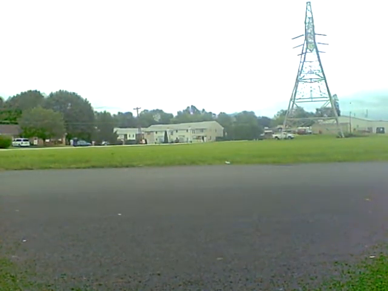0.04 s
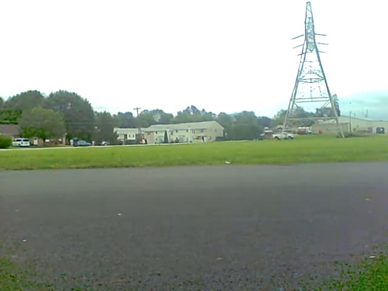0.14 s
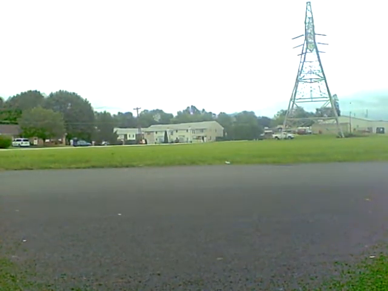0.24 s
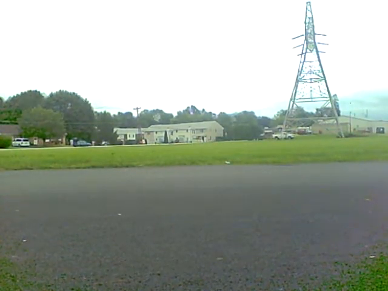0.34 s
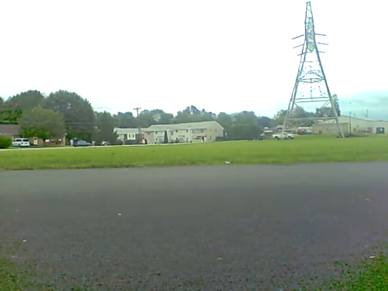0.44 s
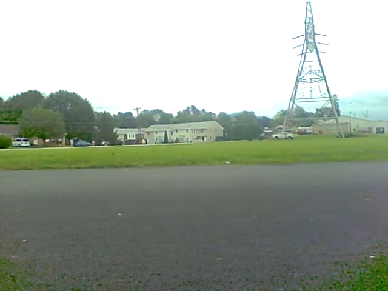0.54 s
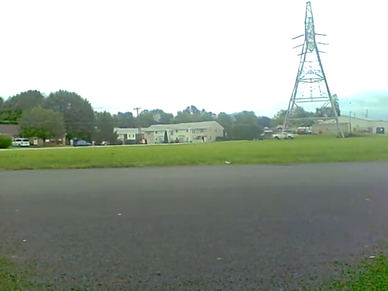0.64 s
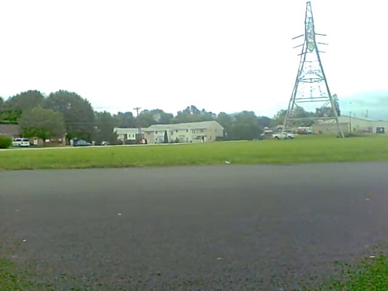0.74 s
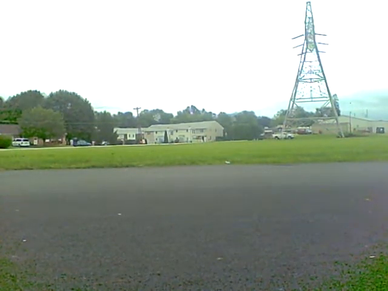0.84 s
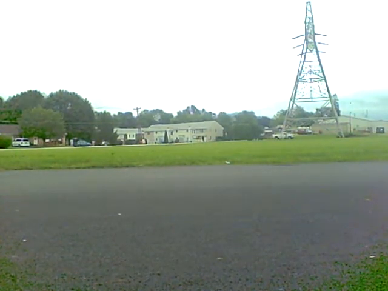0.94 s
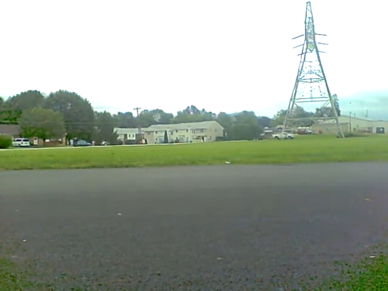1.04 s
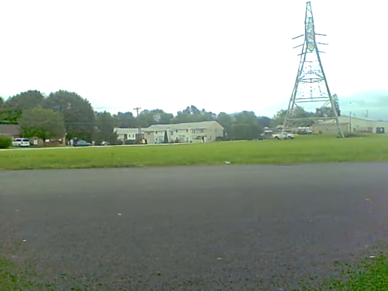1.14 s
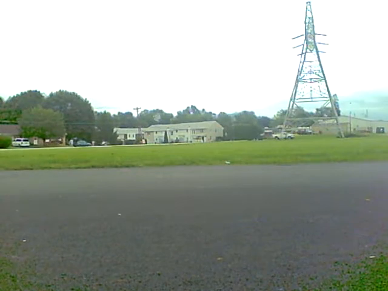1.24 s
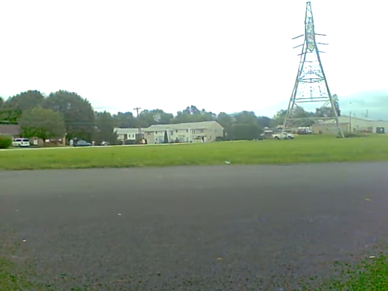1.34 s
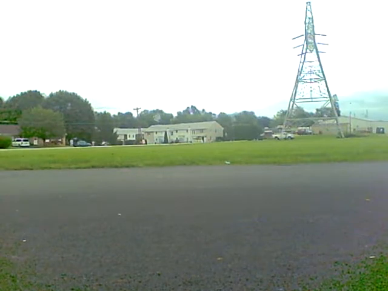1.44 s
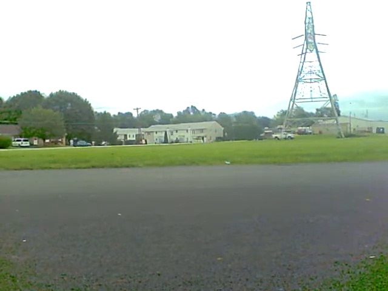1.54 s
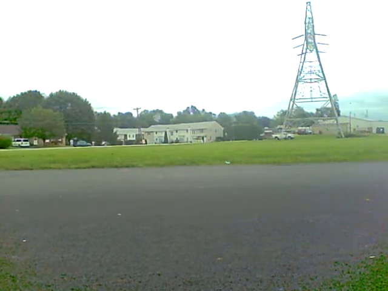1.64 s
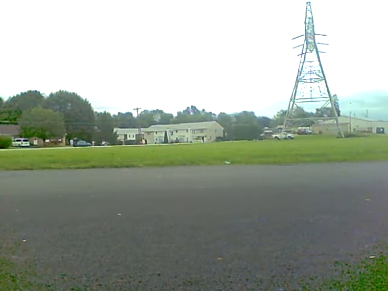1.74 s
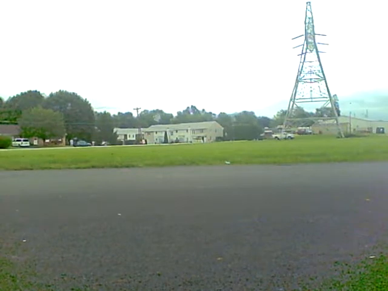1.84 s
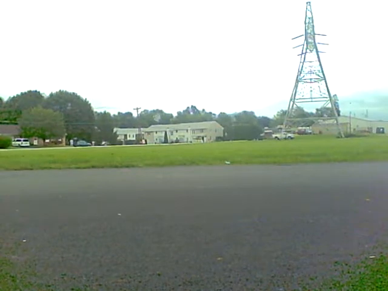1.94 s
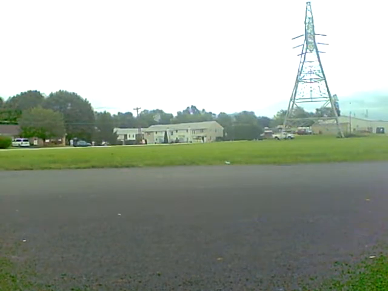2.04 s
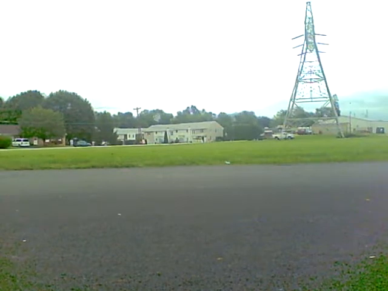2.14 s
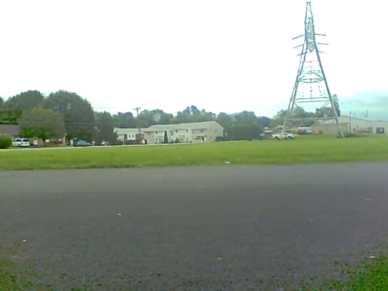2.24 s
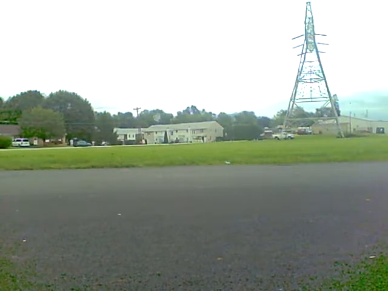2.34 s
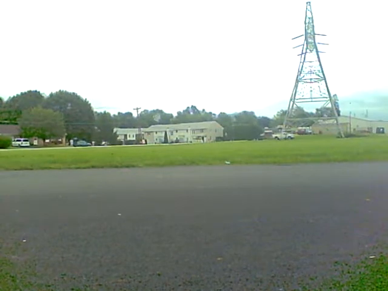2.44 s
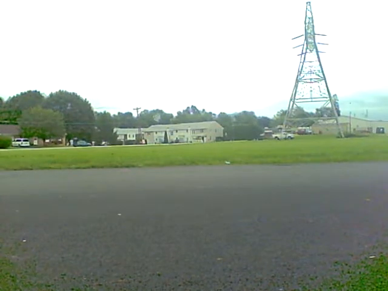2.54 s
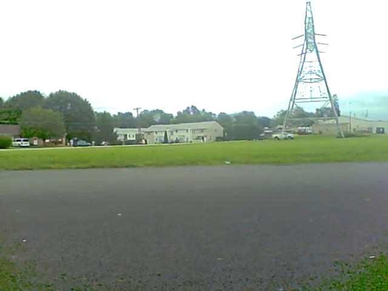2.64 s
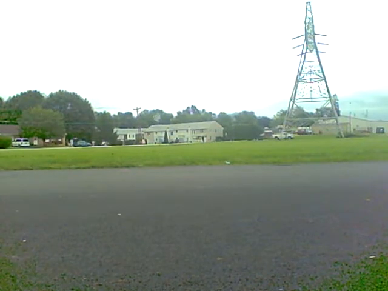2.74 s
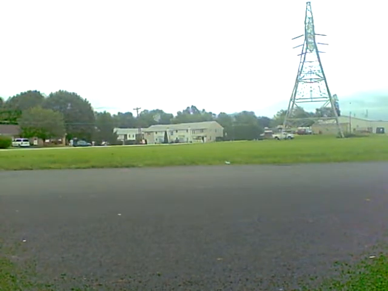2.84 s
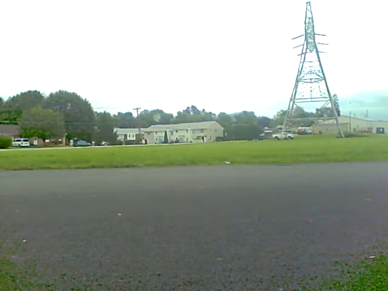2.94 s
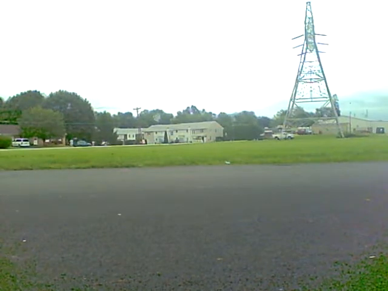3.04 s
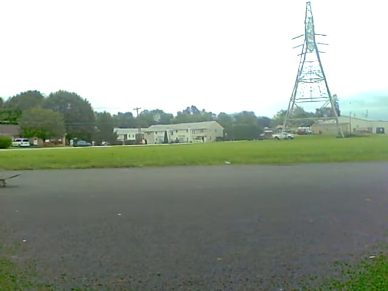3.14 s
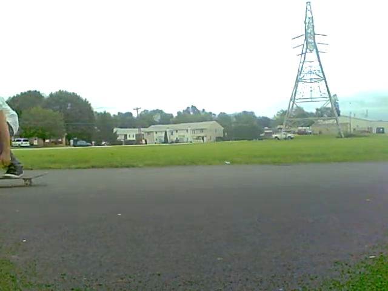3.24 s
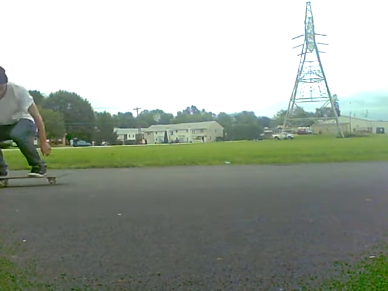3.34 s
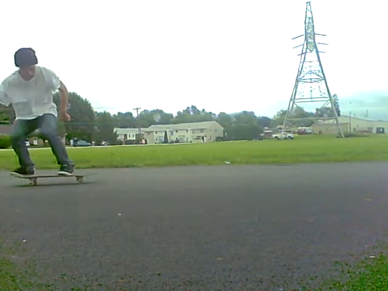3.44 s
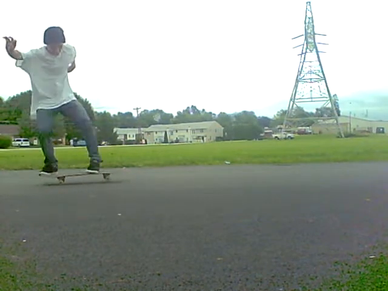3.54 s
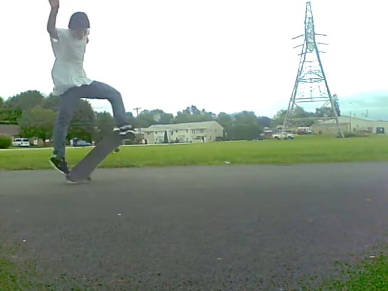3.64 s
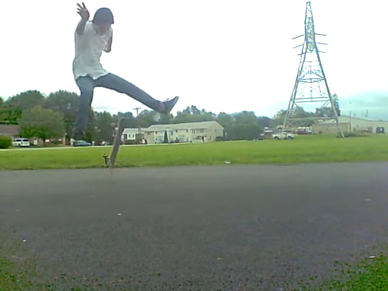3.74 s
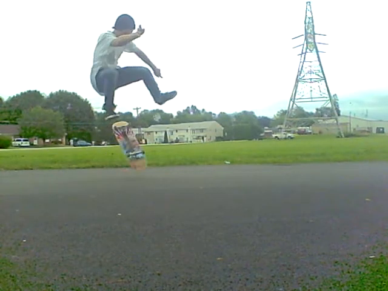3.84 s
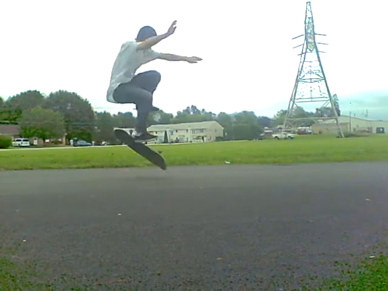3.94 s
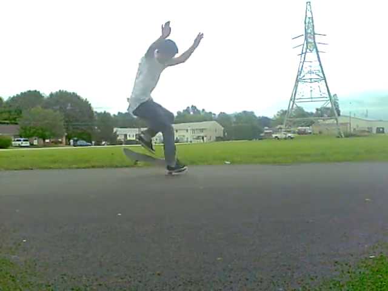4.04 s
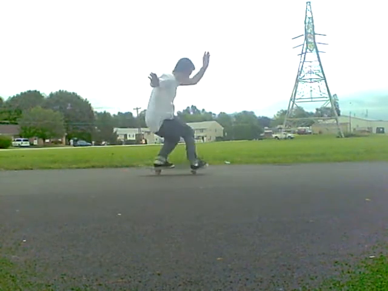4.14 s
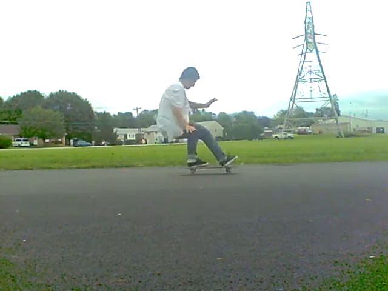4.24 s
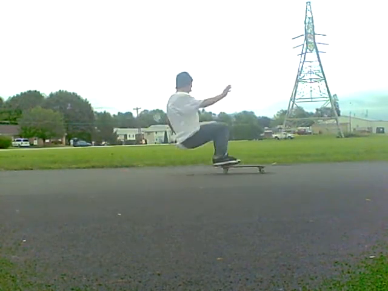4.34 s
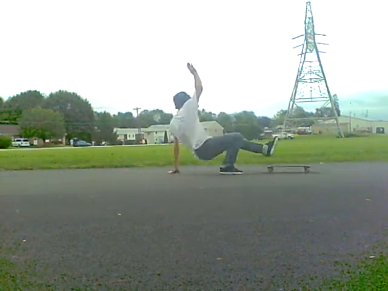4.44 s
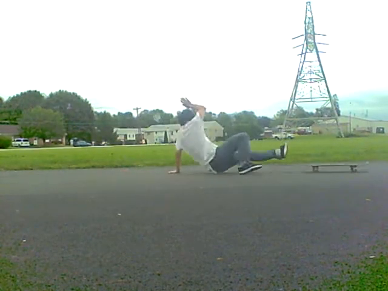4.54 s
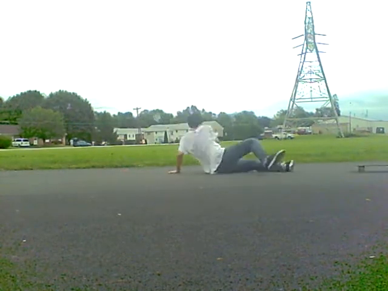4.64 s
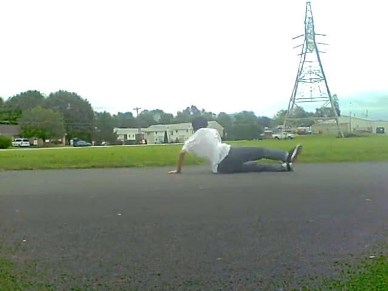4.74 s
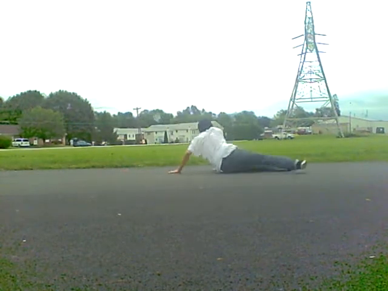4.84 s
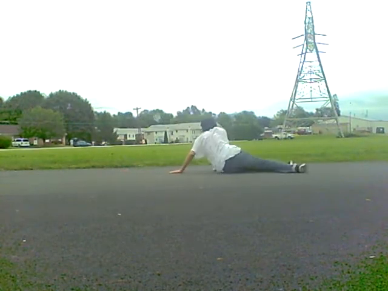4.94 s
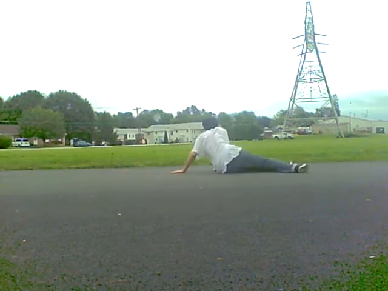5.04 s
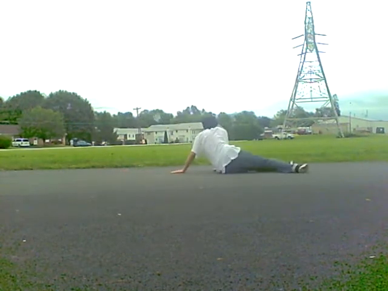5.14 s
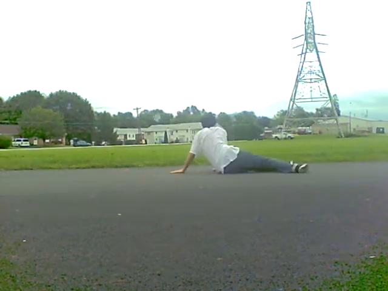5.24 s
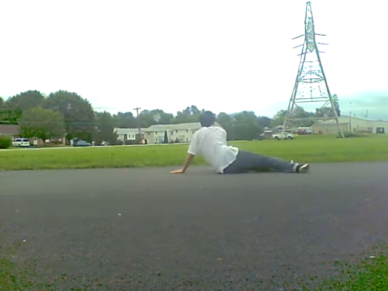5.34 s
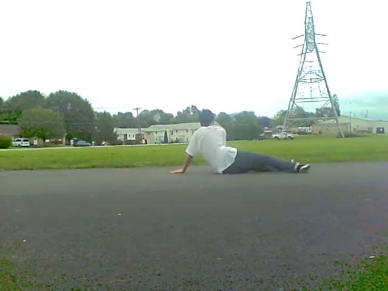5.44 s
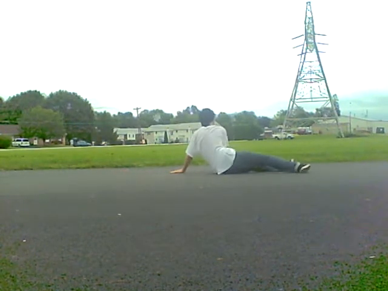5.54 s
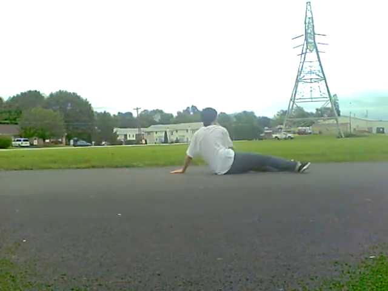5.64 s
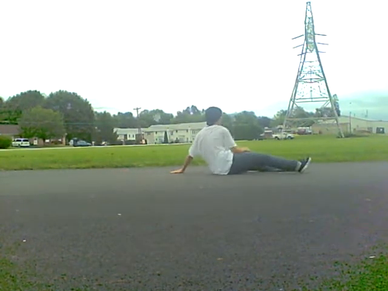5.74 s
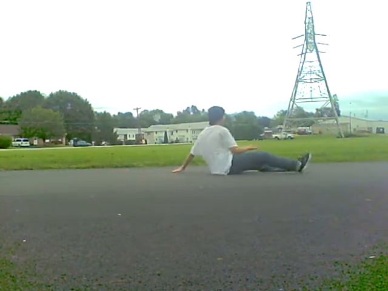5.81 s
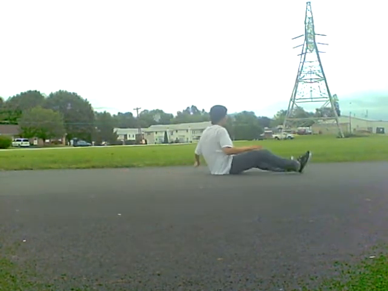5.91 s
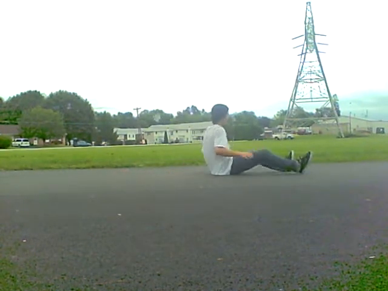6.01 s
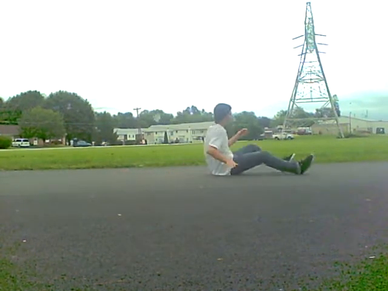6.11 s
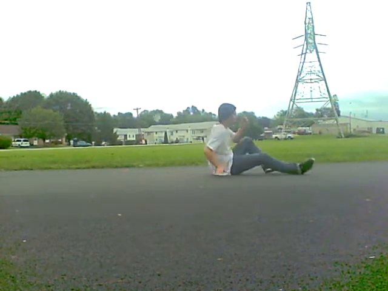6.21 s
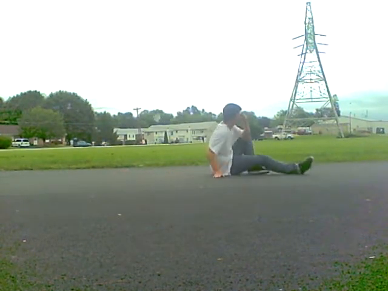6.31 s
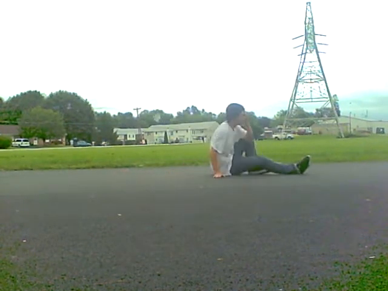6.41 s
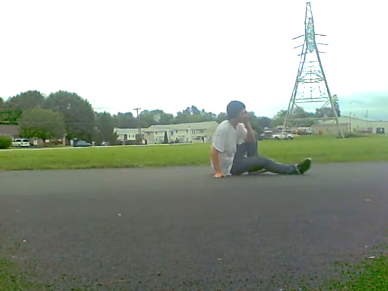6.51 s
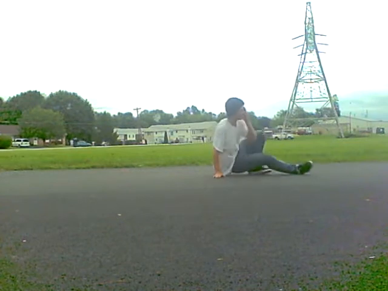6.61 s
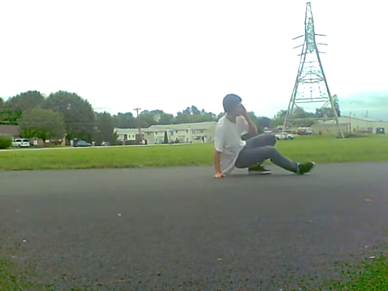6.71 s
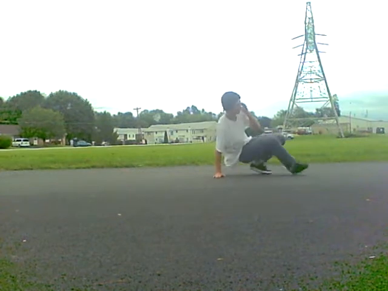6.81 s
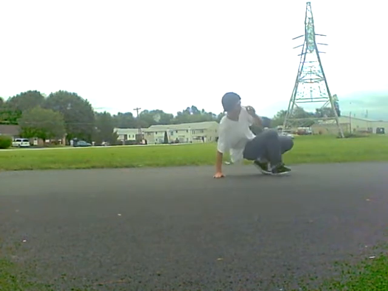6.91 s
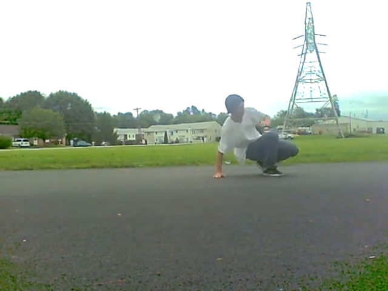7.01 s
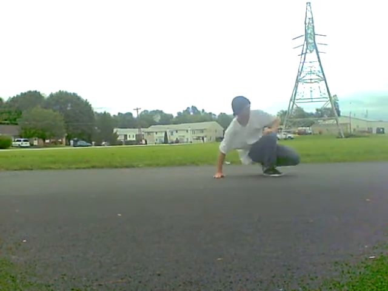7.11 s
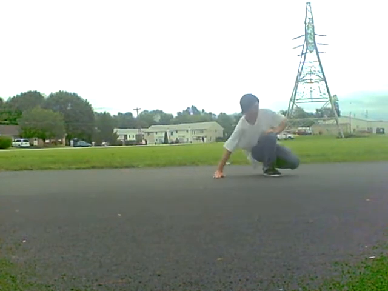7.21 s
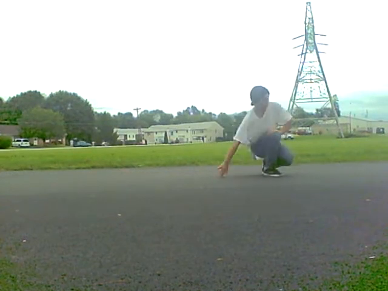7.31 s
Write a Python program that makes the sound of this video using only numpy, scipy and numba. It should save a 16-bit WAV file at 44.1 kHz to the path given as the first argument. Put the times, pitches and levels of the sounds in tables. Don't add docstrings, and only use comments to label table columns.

```python
import sys
import numpy as np
from scipy import signal
from scipy.fft import rfft, irfft
from scipy.io import wavfile
from scipy.ndimage import uniform_filter1d
from numba import njit

SR = 44100
rng = np.random.default_rng(int(sys.argv[2]) if len(sys.argv) > 2 else 0)


def wav_out(sig):
    wavfile.write(sys.argv[1], SR, np.round(np.clip(np.atleast_2d(sig).T, -1, 1) * 32767).astype(np.int16))


def invert_db(level):
    return 10 ** (np.asarray(level, dtype=float) / 20)


N = 325093
TIME = np.arange(N) / SR

# centre_hz, width_hz, level_db
CRACK_MODES = [(2260, 570, 1), (3500, 690, 2), (4760, 1400, 0), (6380, 810, 3.5)]


def unit(x):
    return x / np.sqrt(np.mean(x ** 2))


@njit
def svf(x, hz, width):
    y, band_state, low_state = np.empty(len(x)), 0., 0.
    for i in range(len(x)):
        g, k = np.tan(np.pi * hz[i] / SR), width / hz[i]
        v = (band_state + g * (x[i] - low_state)) / (1 + g * (g + k))
        band_state = 2 * v - band_state
        low_state += 2 * g * v
        y[i] = k * v
    return y


def band(x, hz, width):
    return svf(x, hz * np.ones(N), float(width))


def body(x, modes):
    out = np.zeros(N)
    for k, (hz, width, db) in enumerate(modes):
        out += (-1) ** k * invert_db(db) * unit(band(x, hz, width))
    return out


def walk(rate):
    k = int(SR / rate)
    held = rng.standard_normal(N)[np.arange(N) // k]
    return 1.77 * uniform_filter1d(uniform_filter1d(held, k), k)


def grains(rate, spread_db):
    when, size, sign = rng.random(N), rng.exponential(size=N), rng.choice([-1., 1.], N)
    return (when < rate / SR) * invert_db(spread_db * np.minimum(size, 3)) * sign


def add(out, s, sound):
    i = int(s * SR)
    out[i:i + len(sound)] += sound[:N - i]


def fade(t, t60):
    return np.exp(-np.log(1000) * t / t60)


def ring(hz, t60, rise):
    t = TIME[:SR // 5]
    return (1 - np.exp(-t / rise)) ** 2 * fade(t, t60) * np.sin(2 * np.pi * hz * t)


def bursts(events):
    out, t = np.zeros(N), TIME[:SR // 5]
    for s, db, t60 in events:
        add(out, s, invert_db(db) * (1 - np.exp(-t / 0.0003)) * fade(t, t60))
    return out


def holds(events, rise_s, fall_s):
    out = np.zeros(N)
    for s, length, db in events:
        before = np.clip((s - TIME) / rise_s, 0, 5)
        after = np.clip((TIME - s - length) / fall_s, 0, 5)
        out += invert_db(db - 20 * before - 20 * after)
    return out


def town():
    # pitch_hz, level_db per Hz
    bass = [(15, -75), (60, -76), (110, -82), (250, -85)]
    # pitch_hz, level_db per Hz
    upper_town = [(400, -79), (620, -84.5), (1000, -91), (1300, -85), (1650, -102), (2200, -103),
                  (2700, -109), (3300, -107), (4600, -112), (6400, -102), (6900, -113), (7600, -122)]
    # time_s, level_db
    swell = [
        (0, 0),
        (.6, -2.5),
        (2.5, -1.5),
        (3.7, 0),
        (4.2, -6.5),
        (4.8, -2),
        (6.9, -0.5),
        (7.37, -1.5),
    ]
    # pitch_hz, level_db (rms)
    whine_lines = [(3252, -85.5)]
    hz = np.maximum(np.fft.rfftfreq(N, 1 / SR), 1)
    table_hz, table_db = np.transpose(bass + upper_town)
    shape = invert_db(np.interp(np.log(hz), np.log(table_hz), table_db))
    noise = rfft(rng.standard_normal(N)) * shape * np.sqrt(SR / 2)
    split_hz = bass[-1][0]
    deep = irfft(noise * (hz < split_hz), N) * invert_db(8.5 + .8 * walk(2.4))
    ranges = [((hz >= split_hz) & (hz < 350), 1.2), ((hz >= 350) & (hz < 1800), 1.3), (hz >= 1800, .5)]
    air = sum(irfft(noise * part, N) * invert_db(flicker_db * walk(12)) for part, flicker_db in ranges)
    whine = sum(np.sqrt(2) * invert_db(db) * np.sin(2 * np.pi * line_hz * TIME) for line_hz, db in whine_lines)
    return deep + air * invert_db(np.interp(TIME, *np.transpose(swell))) + whine


def engine():
    # time_s, cycle_rate_hz
    speed = [(0, 28.8), (1.1, 28.9), (2.1, 28.69), (2.6, 28.7), (3.1, 28.49), (4.3, 28.68), (4.6, 28.72),
             (5.1, 28.43), (5.6, 28.28), (7.37, 28.2)]
    order = [2, 3, 5, 6, 7, 8, 3.55, 7.1, 10.65, 14.2]
    order_db = [-63.5, -52, -48.5, -51, -60.5, -57, -51, -51, -57, -74]
    phase = 2 * np.pi * np.cumsum(np.interp(TIME, *np.transpose(speed))) / SR
    lines = np.zeros(N)
    for k, db in zip(order, order_db):
        breathing = invert_db(db + 1.5 * walk(5.0))
        lines += breathing * np.cos(k * phase + .75 * walk(3.91))
    start_db, rise_s = -3, 0.55
    return np.sqrt(2) * lines * invert_db(start_db * np.clip(1 - TIME / rise_s, 0, 1))


def wind():
    # start_s, length_s, level_db
    puffs = [(.5, 0.034, -32.5), (.66, 0.047, -30), (.78, 0.11, -30.5), (.9, 0.2, -33.5),
             (1.16, 0.084, -43), (5.65, 0.11, -42), (5.78, 0.043, -34), (5.85, 0.02, -41.5),
             (5.95, .05, -42.5), (6.07, 0.11, -38.5), (6.2, 0.12, -42), (6.81, 0.023, -34),
             (6.862, 0.036, -25.5), (6.97, 0.028, -32), (7.04, 0.1, -35), (7.2, 0.19, -40.5)]
    # time_s, peak_db, pitch_hz, snap_db
    wind_pops = [(0.527, -22.5, 218, -17), (0.667, -28, 205, -15), (0.686, -21, 293, -39),
                 (0.745, -23.5, 355, -15), (0.779, -26.5, 293, -7.5), (0.804, -26, 213, -27),
                 (0.82, -20, 202, -30), (0.86, -9, 450, -15.5), (0.938, -30, 202, -24),
                 (0.955, -23.5, 264, -19), (1.183, -32, 213, -9), (1.379, -31, 300, -7),
                 (5.367, -28.5, 460, -17), (5.809, -21.5, 210, -38), (6.09, -23.5, 205, -24),
                 (6.143, -31.5, 295, -11), (6.798, -20.5, 288, -8.5), (6.83, -23, 202, -15),
                 (6.864, -17, 345, -25), (6.876, -27, 342, -16), (6.891, -19.5, 300, -22),
                 (6.899, -18.5, 318, -32), (6.933, -26, 266, -12), (6.972, -25, 197, -21),
                 (6.991, -23, 242, -14), (7.032, -30, 202, -24), (7.055, -29, 377, -24),
                 (7.088, -23.5, 277, -29), (7.115, -22.5, 215, -19), (7.135, -22.5, 265, -24),
                 (0.857, -25, 251, -18), (0.866, -27, 233, -10), (1.02, -32, 388, -14),
                  (5.978, -32, 298, -8.5), (6.074, -39, 207, -18), (6.805, -27, 232, -18),
                  (6.837, -29, 221, -9), (6.981, -36, 285, -7), (7.004, -29, 487, -20),
                  (7.164, -35, 200, -21)]
    eddies = grains(900, 2.9)
    thump = unit(band(band(band(eddies, 110, 220), 160, 350), 140, 500))
    flap = unit(band(band(band(eddies, 470, 290), 460, 420), 310, 650))
    gusts = holds(puffs, rise_s=0.035, fall_s=0.016)
    out = unit(thump + invert_db(-19) * flap) * gusts * invert_db(2 * walk(40) - 9.5)
    for s, db, hz, snap_db in wind_pops:
        cycles = 1.25 + 0.19 * max(-22 - db, 0)
        for part_db, part_hz in ((db - 4.5, hz), (db + snap_db + 2.0, 720)):
            t = TIME[:int(SR * cycles / part_hz) + 1]
            start = s + 0.00315 - t[-1] / 2
            swing = -np.cos(2 * np.pi * part_hz * (t - t[-1] / 2))
            add(out, start, invert_db(part_db) * np.sin(np.pi * t / t[-1]) ** 2 * swing)
    return out


def ticks():
    # time_s, peak_db, dull_db (duller part over the peak)
    clicks = [
        (6.49, -62, -1),
        (6.562, -58, -5),
        (6.6077, -49.5, 5),
        (6.635, -61, 0),
        (6.7133, -51.5, -4),
        (6.7298, -56, 2),
        (6.754, -56, -1),
        (6.8463, -54, -1),
        (7.215, -61, -6),
    ]
    noise = rng.standard_normal(N)
    sharp = bursts([(s, db + 14.5, .03) for s, db, _ in clicks])
    bright = band(band(sharp * noise, 3650, 900), 3300, 1300)
    blunt = bursts([(s, db + dull_db - 12, .025) for s, db, dull_db in clicks])
    return bright + blunt * unit(band(noise, 1600, 1200))


def scraping():
    # start_s, length_s, level_db, grit_db (over the deck)
    scrapes = [(3.715, 0.013, -35, -10.5), (4.105, 0.049, -36.5, -17), (4.148, 0.071, -43, -15.5),
               (4.251, 0.034, -46, -15), (4.313, 0.066, -51.5, -19), (4.387, 0.0099, -42, -22.5),
               (4.411, 0.044, -46.5, -13), (4.538, 0.042, -47, -11.5), (4.591, 0.039, -50, -6),
               (4.64, 0.055, -59, -4.5), (6.467, 0.017, -49, -8.5)]
    # centre_hz, width_hz, level_db
    rasp_modes = [(546, 224, 4), (915, 730, 3), (1400, 500, -3.5), (2080, 930, -13.5)]
    # time_s, peak_db
    stone_ticks = [(0.863, -41.5), (1.2376, -46), (1.5364, -53), (2.813, -52), (2.921, -47),
                   (3.6118, -40.5), (4.1264, -41), (4.3415, -52), (4.556, -47), (4.571, -47), (4.627, -48),
                   (4.7786, -48), (4.813, -52), (4.9072, -47.5), (5.504, -50)]
    rise_s, fall_s = 0.013, 0.025
    slips = grains(5000, 2.5) * invert_db(1.8 * walk(120))
    deck_gain = holds([row[:3] for row in scrapes], rise_s, fall_s)
    deck = unit(body(band(slips, 1200, 1400), rasp_modes)) * deck_gain
    grit_gain = holds([(s, length, db + grit_db) for s, length, db, grit_db in scrapes], rise_s, fall_s)
    grit = unit(body(slips, CRACK_MODES)) * grit_gain
    tick_gain = invert_db(-6.5) * bursts([(s, db, 0.016) for s, db in stone_ticks])
    return deck + grit + tick_gain * unit(body(rng.standard_normal(N), CRACK_MODES))


def wheels():
    # time_s, level_db
    roll = [(0, -63), (.16, -53), (.45, -50), (.62, -58), (1.15, -55.5), (1.55, -50), (2.1, -56),
            (2.7, -49), (2.95, -55), (3.2, -49), (3.4, -58), (3.56, -46), (3.68, -68), (4.21, -51.5),
            (4.27, -39), (4.45, -55.5), (5.2, -57), (7.37, -62)]
    # centre_hz, width_hz, level_db
    deck_modes = [(487, 180, 2.5), (950, 330, -4.5), (960, 77, -28.5)]
    # centre_hz, width_hz, level_db
    grit_modes = [(2170, 880, -19.5), (3380, 1100, 8), (4800, 920, 3), (6450, 400, 10.5)]
    bail_s, unload_s, crouch_s = 4.45, 0.07, 2.9
    lower_hz, upper_hz = 1310, 2200
    roll_db = np.interp(TIME, *np.transpose(roll))
    empty = np.clip((TIME - bail_s) / unload_s, 0, 1)
    gone_s = np.maximum(TIME - bail_s - unload_s, 0)

    def rolling(rider_db, empty_db):
        return invert_db(roll_db + rider_db + (empty_db - rider_db) * empty + 1.3 * walk(9))

    sag = 0.15 * (TIME > crouch_s) * (1 - empty)
    deck_hz = 675 * (1 + .06 * walk(7.2) - sag)
    stones = grains(1500, 3.4) * invert_db(0.61 * walk(30))
    main = unit(band(band(stones, deck_hz, 88), deck_hz, 200))
    rumble = unit(main + body(band(stones, 650, 800), deck_modes))
    flex = unit(band(band(stones, 310, 190), 414, 240))
    lower = unit(band(band(stones, lower_hz, 210), lower_hz, 260))
    upper = unit(band(band(stones, upper_hz, 350), upper_hz, 450))
    upper = upper * invert_db(-np.minimum(10.5 * gone_s, 14))
    grit = unit(body(grains(5000, 6.4) * invert_db(0.66 * walk(40)), grit_modes))
    grit = grit * invert_db(-70 + 5.5 * empty * np.exp(-gone_s / .3))
    deck = rumble * rolling(0, 0) + flex * rolling(0.5, -10.5)
    return deck + lower * rolling(-22.5, -5) + upper * rolling(-38.5, -9.5) + grit


def board():
    # time_s, ring_peak_db, ring_hz, low_db (weight on the deck), upper_db (hardness)
    blows = [(0.316, -24, 675, -31, -15), (3.02, -26, 538, -16, -18), (3.604, -26.5, 690, -14, -17),
             (3.714, -25, 610, -3.5, 2), (4.099, -4, 653, -10, -7), (4.1167, -9, 640, -11, -19),
             (4.142, -21, 716, -4.5, -15), (4.1518, -2.5, 755, -16.5, -14), (4.1567, -15, 544, -34, -18),
             (4.195, -25.5, 716, -5.5, 3), (4.203, -25, 513, -17, 0), (4.215, -18.5, 640, -24, -7.5),
             (4.2673, -22.5, 610, -32, -22), (4.297, -23.5, 570, -13, -17), (4.384, -27, 610, -12, -4),
             (4.464, -29, 694, -26, 1.5), (4.4975, -7, 664, -26, -15.5), (4.513, -37, 850, -19, -14),
             (4.696, -20.5, 640, -15.5, -8.5), (4.965, -22.5, 612, -11.5, -12), (6.466, -28, 830, -9, -1),
             (6.475, -36.5, 746, -21, 6.5)]
    # pitch_hz, level_db, t60_s
    low_modes = [(249, 5.5, 0.071), (286, 7.5, 0.093), (530, -0.5, 0.021)]
    # pitch_hz, level_db, t60_s
    upper_modes = [(1180, 6, 0.021), (1414, 3, 0.026), (1713, 11.5, 0.006), (2200, 0, 0.011)]
    # time_s, peak_db, pitch_hz, t60_s
    clanks = [(.8635, -31, 4600, 0.0034), (.863, -23.5, 1360, 0.0057), (3.715, -34.5, 3250, 0.017),
              (4.099, -27, 2820, 0.018), (4.099, -23.5, 4000, 0.014), (4.156, -29.5, 2170, 0.023),
              (4.1553, -10, 3500, 0.0045), (4.197, -35, 2150, 0.017), (4.696, -28, 4800, 0.0034),
              (4.697, -39, 3400, 0.0028), (4.6965, -24, 6200, .004), (2.813, -39, 6230, 0.0073),
              (4.813, -56, 4900, .02), (6.801, -35, 1500, 0.0042)]
    ring_t60_s, crack_t60_s, crack_db, detune = 0.022, 0.016, -15, .04
    out = np.zeros(N)
    for (s, db, hz, low_db, upper_db), chance in zip(blows, rng.standard_normal((len(blows), 8))):
        sound = ring(hz, ring_t60_s, 0.00081) + invert_db(-11.5) * ring(hz * 1.335, ring_t60_s, 0.00015)
        for modes, group_db in ((low_modes, low_db), (upper_modes, upper_db)):
            for (mode_hz, mode_db, t60), c in zip(modes, chance):
                sound += invert_db(group_db + mode_db - 8.0) * ring(mode_hz * (1 + detune * c), t60, 0.0015)
        add(out, s, invert_db(db) * sound)
    for s, db, hz, t60 in clanks:
        t60 = min(t60, .02)
        add(out, s, invert_db(db) * (ring(hz, t60, 0.00074) + invert_db(-10.5) * ring(hz, t60, 0.00038)))
    crack = bursts([(s, db + upper_db + crack_db, crack_t60_s) for s, db, _, _, upper_db in blows])
    return out + crack * unit(body(rng.standard_normal(N), CRACK_MODES))


def scene():
    hits = board() + scraping() + ticks()
    tail = rng.standard_normal(SR // 4) * fade(TIME[:SR // 4], 0.14)
    wet = band(signal.fftconvolve(hits, tail)[:N], 620, 1200) * invert_db(-45)
    shade = signal.butter(6, 6750, fs=SR, output="sos")
    front = signal.sosfilt(shade, hits + wet + wheels())
    return (front + engine() + town() + wind())[None]


def low_pass(x):
    return signal.sosfilt(signal.butter(12, 8040, fs=SR, output="sos"), x)


def record(dry):
    steep = signal.ellip(8, .5, 80, 7530, fs=SR, output="sos")
    return low_pass(signal.sosfilt(steep, dry))


dry = scene()
out = record(dry)
wav_out(out)
```